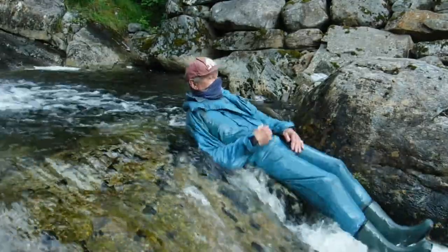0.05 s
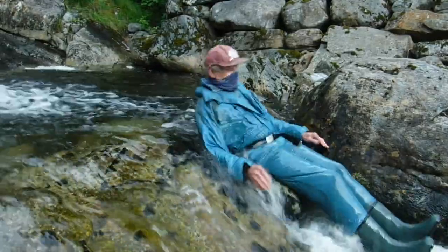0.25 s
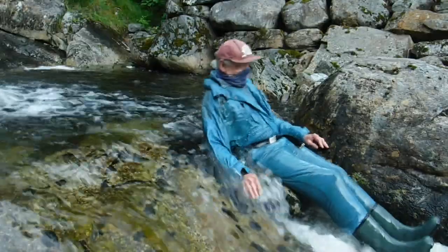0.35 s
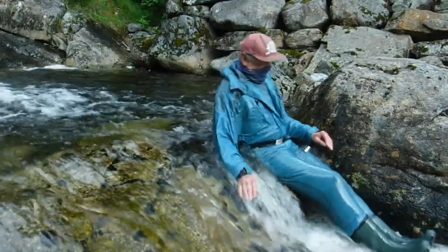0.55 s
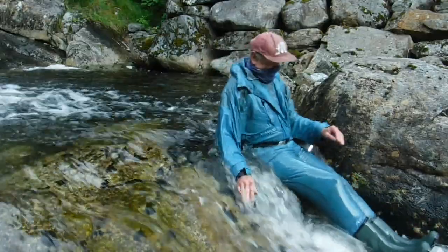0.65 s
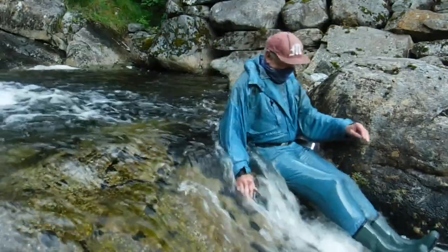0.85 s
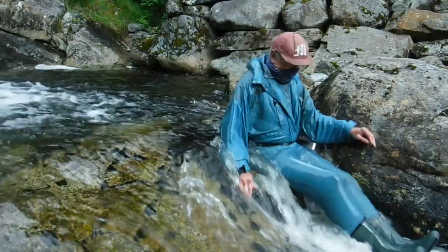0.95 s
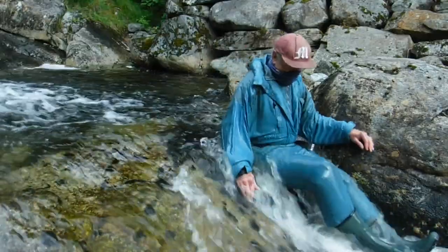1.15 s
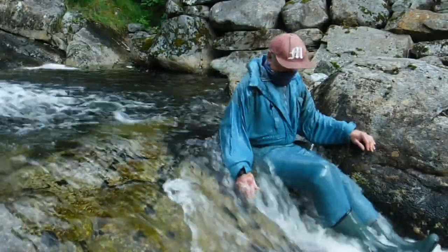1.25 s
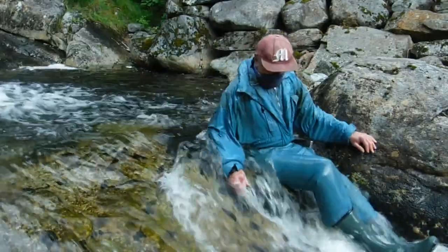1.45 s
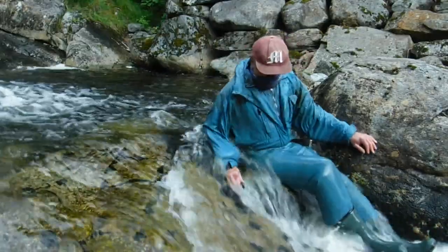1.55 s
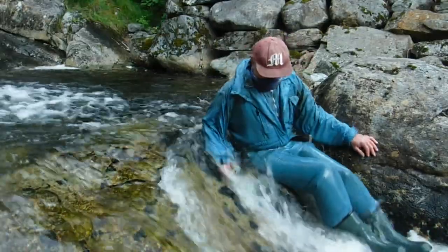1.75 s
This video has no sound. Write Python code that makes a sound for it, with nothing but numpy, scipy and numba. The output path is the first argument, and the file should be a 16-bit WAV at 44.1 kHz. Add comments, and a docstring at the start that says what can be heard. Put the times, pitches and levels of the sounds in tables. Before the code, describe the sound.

Close rushing creek with bubbling gurgles, small splashes on rock, and a single hard air thump

```python
"""A creek rushes over rock and around a seated person, close to the microphone.
White water is noise in flickering bands; bubbles and spray are swarms of short rising, fading sines.
A pocket gurgles near one pitch with a few large gulps; splashes are noise bursts on the rock.
The chute drones low as swelling narrow-band noise; air rumbles faintly and one puff thumps the microphone."""
import sys
import numpy as np
from scipy import signal
from scipy.fft import rfft, irfft
from scipy.io import wavfile
from scipy.ndimage import uniform_filter1d
from numba import njit

SR = 44100
rng = np.random.default_rng(int(sys.argv[2]) if len(sys.argv) > 2 else 0)


def generate_wav(signal):
    """Clip the signal to [-1, 1] and save it as 16-bit WAV at the path in sys.argv[1]."""
    frames = np.transpose(np.atleast_2d(signal))
    scaled = np.clip(frames, -1, 1) * 32767
    pcm = np.round(scaled).astype(np.int16)
    wavfile.write(sys.argv[1], SR, pcm)


N = 79380

# relative spectral density of the rushing water: f/Hz, level/dB
RUSH_SPECTRUM = [(150, -15), (300, -10.5), (420, -9), (500, -1.5), (590, -7), (800, 0), (960, 0),
                 (1100, -6), (1330, -0.5), (1650, -2), (1900, -4), (2350, -3), (2750, -7.5), (3150, -6.5),
                 (3550, -14.5), (4300, -15.5), (5600, -21.5), (8000, -21.5), (9800, -29), (12000, -30),
                 (15500, -39)]
BUBBLE_RISE_SHARE = 0.08  # pitch climb over one ring


def undb(db):
    """Decibels to amplitude gain."""
    return 10 ** (np.asarray(db) / 20)


def level(x, db):
    """Scale to an rms level in dB re 1."""
    return x * undb(db) / np.sqrt(np.mean(x ** 2))


def colour(x, points):
    """Filter by gain points (Hz, dB), interpolated over log frequency."""
    hz, db = np.array(points).T
    f_hz = np.arange(N // 2 + 1) * SR / N
    gain = undb(np.interp(np.log(f_hz + 1), np.log(hz), db))
    return irfft(rfft(x) * gain, N)


def band(hz, width_hz):
    """Noise around one resonance, rms 1; the width is between the -6 dB points."""
    f_hz = np.arange(N // 2 + 1) * SR / N
    resonance = 1 + ((f_hz - hz) / (width_hz / 2)) ** 2
    return level(irfft(rfft(rng.standard_normal(N)) / resonance, N), 0)


def walk(rate_hz):
    """Smooth random drift, rms 1: random steps at the given rate, averaged twice."""
    k = int(SR / rate_hz)
    steps = np.repeat(rng.standard_normal(N // k + 1), k)
    smooth = uniform_filter1d(uniform_filter1d(steps, k), k)
    return level(smooth[:N], 0)


def envelope(t, attack_s, hold_s, release_s):
    """Linear rise, hold, exponential fall."""
    rise = np.clip(t / attack_s, 0, 1)
    return rise * np.exp(-np.maximum(t - attack_s - hold_s, 0) / release_s)


@njit
def ring(start, hz, size, cycles, rise):
    """Each bubble is a sine that climbs in pitch and fades by 50 dB over its cycles."""
    out = np.zeros(N)
    for k in range(len(start)):
        n = int(cycles * SR / hz[k]) + 2
        phase = 0.
        for i in range(n):
            phase += 2 * np.pi * hz[k] * (1 + rise * i / n) / SR
            # tails past the end wrap to the start
            out[(int(start[k] * N) + i) % N] += size[k] * np.exp(-5.76 * i / n) * np.sin(phase)
    return out


def swarm(per_s, low_hz, high_hz, cycles, spread_db):
    """Bubbles at random moments and log-even pitches, many faint and a few strong."""
    when, pitch, strength = rng.random((int(per_s * N / SR), 3)).T
    hz = low_hz * (high_hz / low_hz) ** pitch
    # size ~ pitch offsets the shorter, sparser high rings: even spectrum
    size = undb(-spread_db * np.log(np.maximum(strength, .003))) * hz
    return ring(when, hz, size, float(cycles), float(BUBBLE_RISE_SHARE))


def air_rumble():
    """Air rumbling on the microphone: faint, low-weighted noise."""
    # relative spectral density of the rumble: f/Hz, level/dB
    rumble_spectrum = [(10, -6), (32, -1.5), (60, -9.5), (130, -7.5), (250, -22.5), (600, -33),
                       (5000, -100)]
    return level(colour(rng.standard_normal(N), rumble_spectrum), -52)


def chute(t):
    """The cloud of bubbles under the chute drones as a whole, swelling and ebbing."""
    # swelling of the drone: t/s, level/dB
    drone_swell = [(0, -59), (0.29, -52), (0.40, -46), (0.55, -46), (0.63, -54), (0.8, -49.5), (0.9, -55),
                   (1.02, -50.5), (1.2, -48), (1.31, -56), (1.39, -44), (1.48, -53), (1.55, -49.5),
                   (1.63, -62), (1.8, -52)]
    gain = undb(np.interp(t, *np.array(drone_swell).T))
    return gain * band(hz=92.8, width_hz=17.5)


def puff(t):
    """Pressure builds, hits and drops into suction; a high-pass makes it swing back."""
    puff_s, gain_db, lead_share = .2224, 0.05, 0.57
    build_s, hold_s, release_s = 0.0019, 0.00198, 0.00065
    suction_share, suction_s = 0.37, 0.0039
    flutter_share, flutter_hz, flutter_width_hz = 0.048, 1400, 3000
    mic_low_hz = 12

    age = t - puff_s
    after = np.maximum(age - hold_s, 0)
    build = lead_share * np.exp(-abs(age) / build_s)
    push = np.where(age < 0, build, np.exp(-after / release_s))
    push = push * (1 + flutter_share * band(flutter_hz, flutter_width_hz))  # turbulence
    suction = suction_share * after / suction_s * np.exp(1 - after / suction_s)
    highpass = signal.butter(2, mic_low_hz, "high", fs=SR, output="sos")
    thump = signal.sosfilt(highpass, push - suction)
    thump = colour(thump, [(300, -1), (1300, 2.0), (5000, -6.5), (15000, -16)])
    return undb(gain_db) * thump


def spray():
    """Fine droplets and bursting foam: a dense swarm of very short high rings."""
    drops = swarm(per_s=5700, low_hz=3000, high_hz=12000, cycles=3.2, spread_db=4)
    return level(colour(drops, RUSH_SPECTRUM), -53)


def splashes(t):
    """Short slaps of water on the rock: bursts of band noise."""
    # splashes: t/s, centre f/Hz, level/dB
    slaps = [(0.71, 1690, -31), (0.8756, 2000, -39), (1.0166, 1340, -35.5), (1.074, 1880, -35),
             (1.4118, 1640, -29.5), (1.47, 1250, -38)]
    width_hz, attack_s, hold_s, release_s = 380, .001, 0.0056, 0.0033
    out = np.zeros(N)
    for start_s, hz, db in slaps:
        shape = envelope(t - start_s, attack_s, hold_s, release_s)
        out = out + undb(db) * band(hz, width_hz) * shape
    return out


def gulps(t):
    """Large gulps of air in the pocket: short sines that climb in pitch."""
    # gulps: t/s, pitch f/Hz, level/dB
    gulp_events = [(0.252, 727, -26), (0.287, 760, -33), (0.343, 752, -29.5), (0.362, 827, -22.5),
                   (0.429, 744, -31), (1.207, 764, -28.5), (1.231, 694, -31), (1.303, 775, -29.5)]
    attack_s, hold_s, release_s, rise_per_s = 0.0022, 0.0069, 0.0043, 3.6
    out = np.zeros(N)
    for start_s, hz, db in gulp_events:
        age = t - start_s
        tone = np.sin(2 * np.pi * hz * (age + rise_per_s * age ** 2 / 2))
        out = out + undb(db) * tone * envelope(age, attack_s, hold_s, release_s)
    return out


def pocket(flow_db):
    """Large bubbles of like size gurgle in a pocket of water, louder with the current."""
    centre_hz, scatter_share, per_s, cycles = 750.3, 0.083, 260, 25.3
    flow_slope = 1.9  # dB of gurgle per dB of current
    when, pitch, size = rng.random((int(per_s * N / SR), 3)).T
    hz = centre_hz * (1 + scatter_share * (2 * pitch - 1))
    gurgle = ring(when, hz, size, float(cycles), float(BUBBLE_RISE_SHARE))
    return level(gurgle, -43) * undb(flow_slope * flow_db)


def bubbles():
    """Small bubbles ringing in the near current."""
    rings = swarm(per_s=4500, low_hz=440, high_hz=4950, cycles=10.8, spread_db=2)
    return level(colour(rings, RUSH_SPECTRUM), -39)


def wash():
    """White water: a smooth roar whose half-octave bands flicker on their own."""
    flicker_db, flicker_rate_hz = 0.7, 28
    f_hz = np.arange(N // 2 + 1) * SR / N
    place = 2 * np.log2(np.maximum(f_hz, 1) / 125)  # half octaves above 125 Hz
    noise = rfft(rng.standard_normal(N))
    roar = np.zeros(N)
    for k in range(16):
        part = irfft(noise * np.maximum(1 - abs(place - k), 0), N)
        roar = roar + part * undb(flicker_db * walk(flicker_rate_hz))
    return level(colour(roar, RUSH_SPECTRUM), -38)


def scene():
    """The surging current with its gurgles and splashes, and the air at the microphone."""
    # strength of the current: t/s, level/dB
    flow = [(0, -1.3), (0.17, -0.9), (0.3, 1.5), (0.55, -0.8), (0.72, 0.64), (0.9, 0.5), (1.03, 0.46),
            (1.2, 0.7), (1.38, 0), (1.49, 1.5), (1.58, -0.4), (1.8, 0.4)]
    t = np.arange(N) / SR
    flow_db = np.interp(t, *np.array(flow).T)
    air = air_rumble() + puff(t)
    current = wash() * undb(flow_db / 2) + bubbles() * undb(0.99 * flow_db) + spray()
    mix = air + chute(t) + splashes(t) + gulps(t) + pocket(flow_db) + current
    return mix[None]


def record(dry):
    """The recorder cuts the top: a steep elliptic low-pass."""
    lowpass = signal.ellip(10, .1, 80, 15800, fs=SR, output="sos")  # .1 dB ripple, 80 dB stop, Hz
    return signal.sosfilt(lowpass, dry)


dry = scene()
out = record(dry)
generate_wav(out)
```